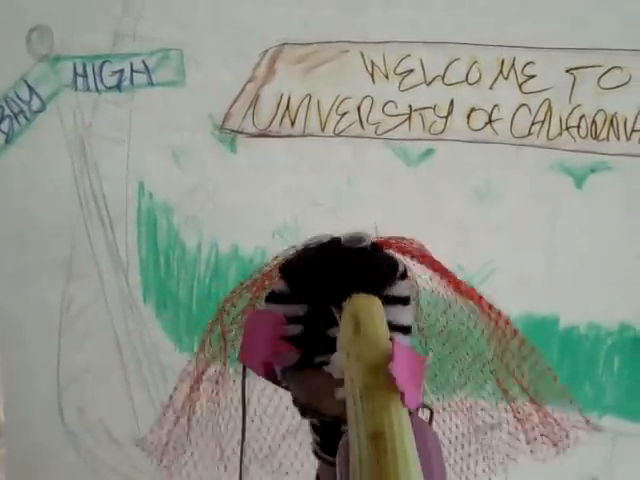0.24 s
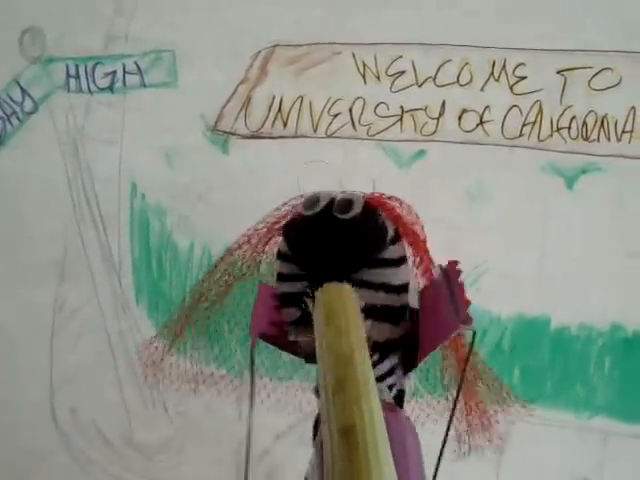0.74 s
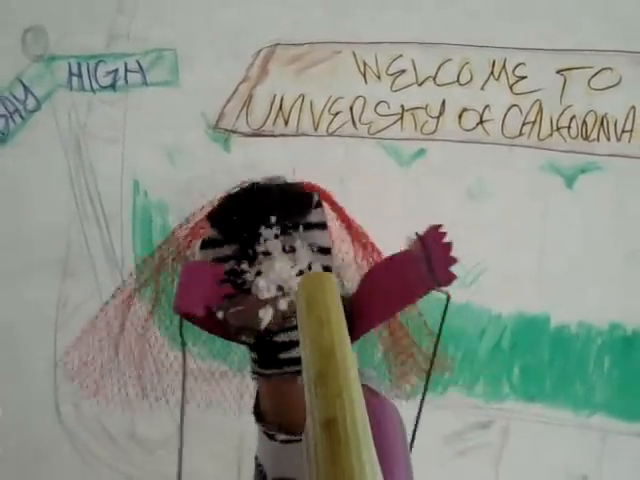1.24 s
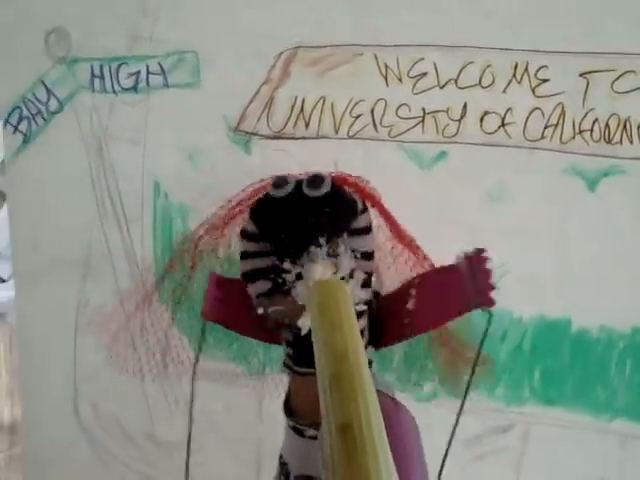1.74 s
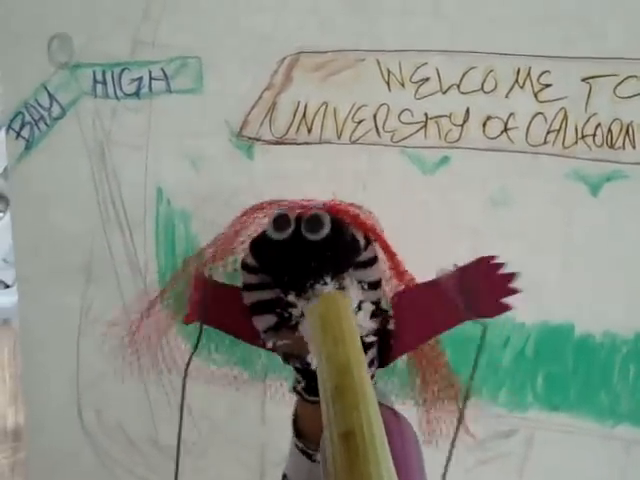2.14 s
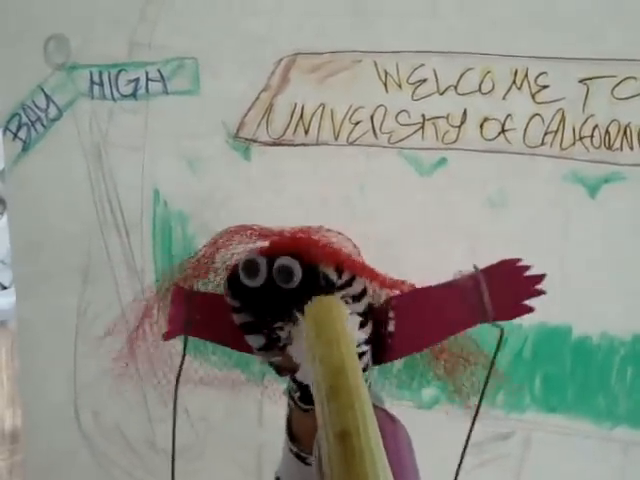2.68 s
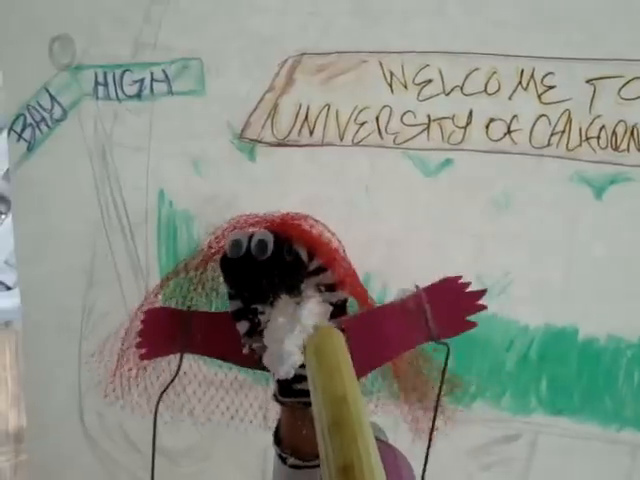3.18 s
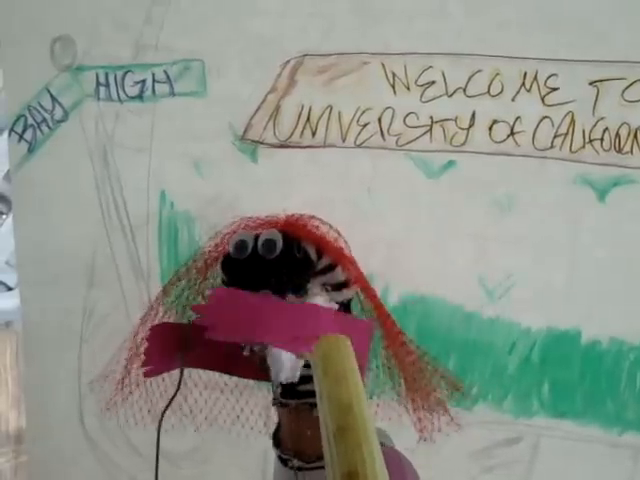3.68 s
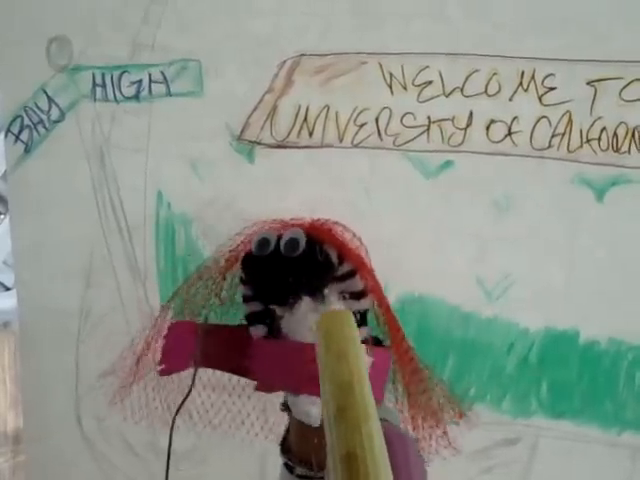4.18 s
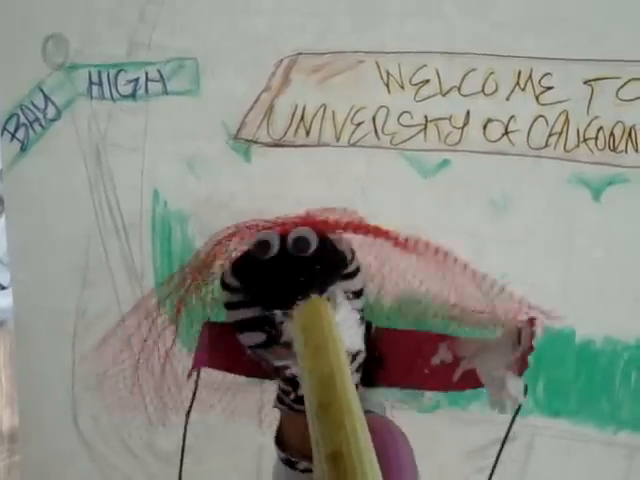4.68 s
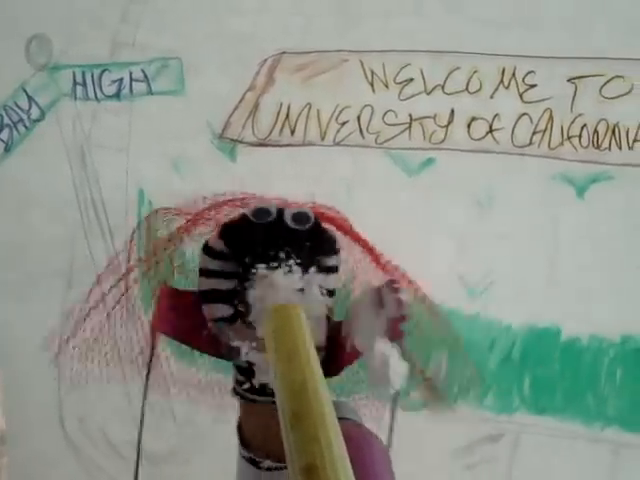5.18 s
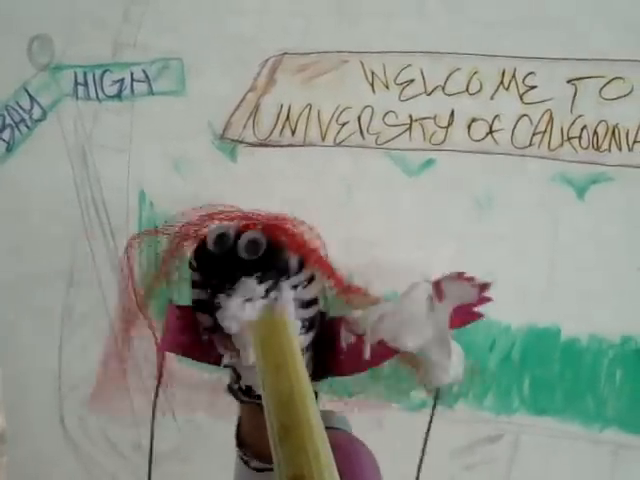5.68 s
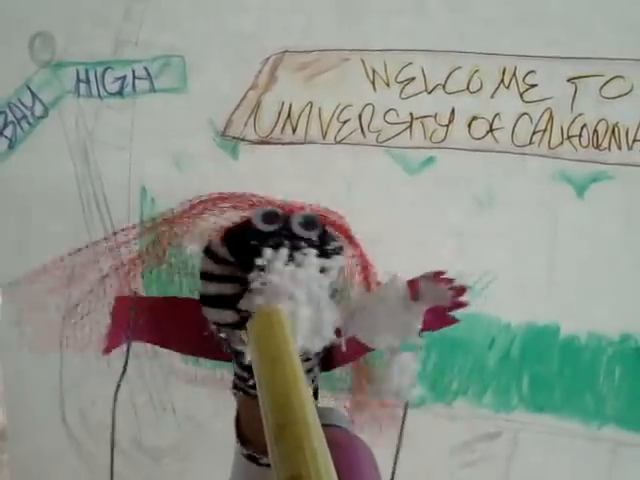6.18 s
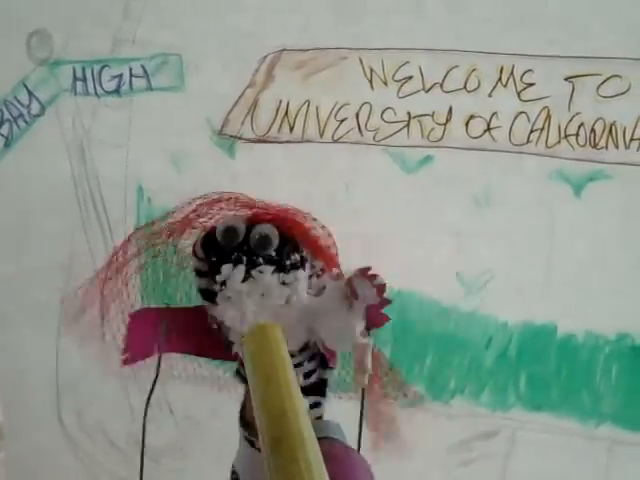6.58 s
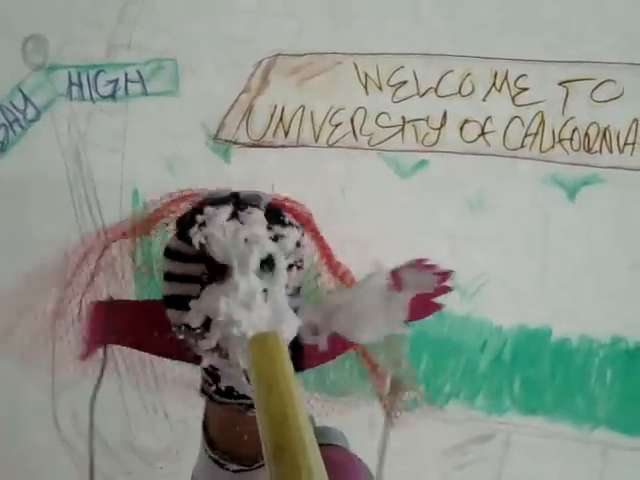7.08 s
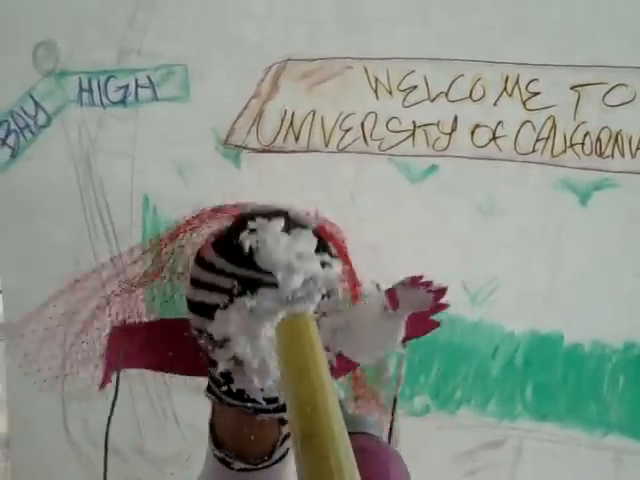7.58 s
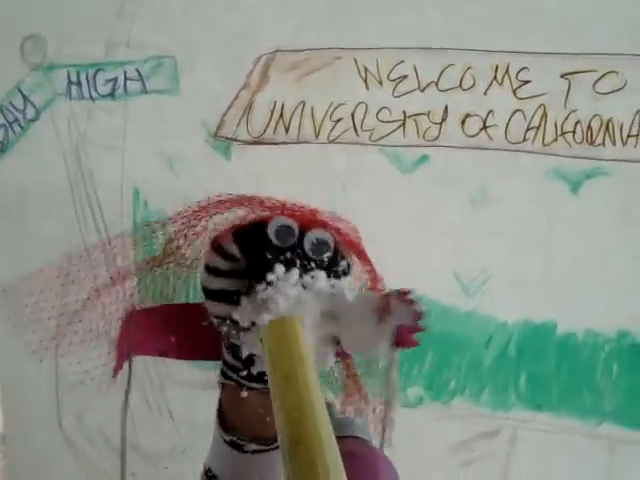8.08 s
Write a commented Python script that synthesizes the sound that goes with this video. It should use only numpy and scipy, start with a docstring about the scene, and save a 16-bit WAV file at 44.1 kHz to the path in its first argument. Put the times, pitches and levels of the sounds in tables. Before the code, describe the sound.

Very close to a small microphone in a dry room, a can sprays foam through a narrow tube. The first burst begins already running, wet and sputtering with hollow pops, sharp spits and air puffs. It cuts off, leaving fine fizz, crackles and a faint gas leak for about a second; then a second hissing burst continues to the end over low rumble and hum.

```python
"""In a room, close to a small microphone, a can sprays foam through a long plastic tube in two bursts.
Turbulent gas and bursting bubbles excite the resonances of the tube; large slugs ring it briefly, and
the jet hisses, flickers and spits. In the pause the foam fizzes and crackles, and a last leak of gas
creeps out. A volley of air puffs and a few single ones push the microphone, over a rumble with hum."""
import sys
import numpy as np
from scipy import signal
from scipy.fft import rfft, irfft
from scipy.io import wavfile

SR = 44100
rng = np.random.default_rng(int(sys.argv[2]) if len(sys.argv) > 2 else 0)


def ratio_of_db(decibels):
    """Turn decibels (scalar or array-like) into linear amplitude factors; 0 dB maps to 1."""
    return 10 ** (np.asarray(decibels, float) / 20)


def master(y):
    """Save y as 16-bit WAV."""
    cut = np.clip(np.atleast_2d(y).T, -1, 1)
    pcm = np.round(cut * 32767)  # scale
    wavfile.write(sys.argv[1], SR, pcm.astype(np.int16))


N = 367353

# Spectrum of the room's rumble: frequency_hz, density_db (per Hz, relative)
RUMBLE_SPECTRUM = [(18, -54), (30, -19.5), (122, -17), (360, -3), (428, -4), (572, -7.5), (1530, -15),
                   (1930, -16), (3000, -35), (3900, -61), (6600, -120)]
# Mains hum: frequency_hz, amplitude_db (relative to the rumble)
HUM_LINES = [(241, -12.5), (361, -19.5)]
# Single puffs of air on the microphone: start_s, push_db
SINGLE_PUFFS = [(0.374, -44), (4.943, -26), (5.639, -29), (6.2928, -29), (7.722, -31), (7.8089, -29)]
# Fizz of resting foam: time_s, level_db
FIZZ_LEVEL = [(2.84, -51), (2.97, -39.5), (3.13, -47), (3.23, -42), (3.3, -50), (3.5, -50.5), (3.63, -52.5),
              (3.8, -45.5), (3.9, -49.5), (4.02, -55)]
# Spectrum of that fizz: frequency_hz, density_db (per Hz, relative)
FIZZ_SPECTRUM = [(800, -12), (2000, -9.5), (4000, -9), (7000, -9.5), (10000, -16)]
# Large bubbles cracking in the pause: start_s, peak_db, centre_hz, t60_s
CRACKLES = [(2.874, -21, 5800, 0.063), (2.9185, -25, 7000, .02), (2.938, -29, 3800, .06),
            (3.0027, -23, 6940, 0.048), (3.059, -34, 3650, .05), (3.203, -37, 3040, .1),
            (3.6525, -34, 6000, .03), (3.689, -26, 4660, 0.043), (3.7214, -40, 4500, 0.045),
            (3.7373, -10.5, 6460, 0.024), (3.741, -24.5, 4500, 0.15)]
# Loud slugs of foam, each ringing one tube mode: start_s, peak_db, pitch_hz
SLUGS = [(0.028, -9, 1860), (0.054, -7, 1770), (0.076, -5, 1840), (0.1, -8, 1870), (0.161, -6, 1300),
         (0.232, -7, 1200), (0.253, -7, 1140), (0.376, -8, 1440), (0.4, -10, 1130), (0.483, -7, 1210),
         (0.607, -12, 1100), (0.684, -10, 1220), (0.711, -9, 1210), (0.937, -9, 1170), (0.962, -11, 1130),
         (1.059, -8, 1170), (1.271, -12, 1200), (1.325, -9, 1180), (1.358, -10, 1190), (5.3, -13, 1980),
         (5.838, -11, 1190)]
# Sharp spits of the jet: start_s, peak_db
SPITS = [(0.3196, -14), (0.576, -9), (0.6069, -13), (0.634, -10), (0.6683, -13), (0.8953, -11),
         (1.0075, -11), (1.3018, -11), (1.3442, -11), (1.513, -13), (4.0461, -25), (6.6003, -15),
         (7.7168, -21)]
# Resonances, one table a layer: centre_hz, width_hz, gain_db (relative)
FIRST_MODES = [(531, 220, -17.5), (763, 220, -7.5), (948, 138, -2.5), (1161, 239, -0.5)]
SECOND_MODES = [(1492, 280, -2), (1728, 243, 2), (1938, 237, 2.5), (2217, 640, -3)]
JET_MODES = [(2800, 760, 0.77), (3308, 700, 1.4), (3823, 1000, 1.7)]
WHISTLE_MODES = [(4420, 830, 0), (4784, 290, 2.5), (5230, 1100, 0)]
FIZZ_MODES = [(6310, 1740, 1), (8070, 4200, 0), (9300, 3100, 0)]
# The foam-filled tube during the leak: centre_hz, width_hz, gain_db (relative)
LEAK_MODES = [(915, 110, 0), (1700, 150, 0), (1960, 100, -3)]
# A bubble bursting outside the tip, which hardly rings: centre_hz, width_hz, gain_db
SNAP_MODES = [(1360, 2100, 0)]
# Flow through the tube, as level of the first layer: time_s, level_db
FLOW = [(0.0, -24), (0.08, -21.5), (0.3, -25), (0.6, -30.5), (0.8, -28), (1.45, -29.5), (2.5, -29.5),
        (2.66, -32.5), (2.76, -30), (4.045, -37), (4.1, -39.5), (4.17, -31.5), (4.7, -29), (5.2, -25),
        (5.5, -26), (6.7, -28), (7.35, -30.5), (7.65, -27), (7.95, -28.5), (8.33, -27)]
# Second layer at the usual flow: time_s, level_db
SECOND_LEVEL = [(0, -24), (0.3, -30), (0.7, -32), (1.1, -30.5), (2.15, -26.5), (2.5, -29.5), (8.33, -30.5)]
# Treble layers at the usual flow: time_s, jet_db, whistle_db, fizz_db
TREBLE_LEVELS = [(0, -27.5, -36.5, -34), (0.2, -28.5, -31.5, -35.5), (0.5, -27.5, -35, -33.5),
                 (1.2, -28.5, -31, -34), (1.6, -28, -33.5, -30.5), (2.15, -32, -38.5, -31),
                 (2.6, -37, -38, -35), (4.05, -31.5, -36.5, -35), (4.3, -35.5, -45, -33),
                 (4.7, -35.5, -39.5, -34.5), (4.95, -35, -34.5, -33), (6.3, -35, -33.5, -33.5),
                 (8.33, -35.5, -36.5, -33.5)]


def evened(x):
    """Normalisation: scales a signal to rms 1."""
    return x / np.sqrt(np.mean(x ** 2) + 1e-20)


def over_time(rows):
    """Linear interpolation: one curve over time for each column after the first."""
    time_s, *columns = np.transpose(rows)
    return [np.interp(np.arange(N) / SR, time_s, column) for column in columns]


def add(mix, start_s, sound):
    """Superposition: mixes a sound in at its start time."""
    part = mix[round(start_s * SR):][:len(sound)]
    part += sound[:len(part)]


def ring(x, modes):
    """Resonance: parallel two-pole peaks, with alternating signs as in a row of modes."""
    out = 0
    for k, (centre_hz, width_hz, gain_db) in enumerate(modes):
        b, a = signal.iirpeak(centre_hz, centre_hz / width_hz, SR)
        out = out + (-1) ** k * ratio_of_db(gain_db) * signal.lfilter(b, a, x)
    return out


def coloured(spectrum):
    """Spectral shaping: steady noise of the given density, rms 1."""
    hz, db = np.transpose(spectrum)
    bins_hz = np.fft.rfftfreq(N, 1 / SR) + 1
    gain = ratio_of_db(np.interp(np.log(bins_hz), np.log(hz), db))
    return evened(irfft(rfft(rng.standard_normal(N)) * gain, N))


def wander(cutoff_hz):
    """Slow random fluctuation: low-passed noise, rms 1."""
    b, a = signal.butter(2, cutoff_hz, fs=SR)
    return evened(signal.lfilter(b, a, rng.standard_normal(N)))


def clicks(per_s, spread_db):
    """Poisson process: random single clicks, a few of them large, rms 1."""
    size_db = spread_db * np.minimum(rng.exponential(1, N), 3.2)
    return evened(ratio_of_db(size_db) * (rng.random(N) < per_s / SR))


def burstlets(train, decay_s):
    """Relaxation: each click becomes an envelope of sudden start and exponential decay."""
    return evened(signal.lfilter([1], [1, -np.exp(-1 / (decay_s * SR))], train))


def swell(start_s, db, rise_s, length_s, fade_db):
    """Transient flow: a gain that rises fast, then fades ever faster until it ends."""
    t = np.arange(N) / SR - start_s
    rise = np.clip(t / rise_s, 0, 1) ** 2
    fade = ratio_of_db(db + fade_db * np.clip(t / length_s, 0, 1) ** 2)
    return rise * (t < length_s) * fade


def hum():
    """Periodic excitation: steady sinusoids of random phase."""
    s = np.arange(N) / SR
    return sum(ratio_of_db(db) * np.sin(2 * np.pi * (hz * s + rng.random())) for hz, db in HUM_LINES)


def room_rumble():
    """Background noise: low-frequency noise and hum that slowly grow together."""
    start_db, end_db, middle_s, growth_s = -54.5, -45.5, 3.07, 2.2
    grown = 0.5 + 0.5 * np.tanh((np.arange(N) / SR - middle_s) / growth_s)
    return ratio_of_db(start_db + (end_db - start_db) * grown) * (coloured(RUMBLE_SPECTRUM) + hum())


def puffs():
    """Impulse response of a diaphragm: each puff pushes it once and it swings slowly back."""
    t = np.arange(-200, 1500) / SR
    b, a = signal.butter(2, 45, "high", fs=SR)
    push = signal.lfilter(b, a, np.exp(-(t / 0.0003) ** 2))
    volley = swell(0.048, db=-23.5, rise_s=0.025, length_s=0.28, fade_db=-18)
    train = volley * (rng.random(N) < 160 / SR)  # 160 puffs per second
    for start_s, push_db in SINGLE_PUFFS:
        train[round(start_s * SR)] = ratio_of_db(push_db)
    return signal.oaconvolve(train, push)[200:][:N]


def echo(x):
    """Reverberation: sparse reflections of random sign that decay exponentially."""
    t60_s = 0.084
    at = np.arange(200, SR // 2, 20)
    taps = np.zeros(SR // 2 + 20)
    sign = rng.choice([-1., 1.], len(at))
    taps[at + rng.integers(0, 20, len(at))] = sign * ratio_of_db(-60 * at / SR / t60_s)
    return signal.oaconvolve(x, taps / np.linalg.norm(taps))[:N]


def foam_fizz():
    """Bubble coalescence: many tiny bursts make coloured noise flicker while the foam rests."""
    s = np.arange(N) / SR
    resting = (s > FIZZ_LEVEL[0][0]) & (s < FIZZ_LEVEL[-1][0])
    bursts = burstlets(clicks(per_s=180, spread_db=2), decay_s=0.0022)
    flicker = ratio_of_db(2.3 * wander(25)) * (2 + 0.36 * bursts)
    return ratio_of_db(over_time(FIZZ_LEVEL)[0]) * resting * evened(flicker * coloured(FIZZ_SPECTRUM))


def crackles():
    """Film rupture: each large bubble is a decaying noise burst through one broad resonance."""
    out, t = np.zeros(N), np.arange(5000) / SR
    for start_s, peak_db, centre_hz, t60_s in CRACKLES:
        envelope = ratio_of_db(-60 * t / t60_s) * (1 - np.exp(-t / 0.0008))
        noise = rng.standard_normal(len(t))
        crack = ring(noise * envelope, [(centre_hz, 0.72 * centre_hz, 0)])
        add(out, start_s, ratio_of_db(peak_db) * crack / abs(crack).max())
    return out


def leak():
    """Turbulence noise: the last gas creeps out through the foam-filled tube."""
    gain = swell(3.14, db=-49, rise_s=0.04, length_s=0.46, fade_db=-13)
    return gain * evened(ring(rng.standard_normal(N), LEAK_MODES))


def spits():
    """Jet noise: each spit is a short burst through the jet modes and the lowest whistle mode."""
    out, t = np.zeros(N), np.arange(900) / SR
    for start_s, peak_db in SPITS:
        noise = rng.standard_normal(len(t))
        spit = ring(noise * np.exp(-t / 0.003), JET_MODES + WHISTLE_MODES[:1])
        add(out, start_s, ratio_of_db(peak_db) * spit / abs(spit).max())
    return out


def slugs():
    """Free vibration: a slug rings one tube mode as a damped sine of a few cycles."""
    out, t = np.zeros(N), np.arange(900) / SR
    for start_s, peak_db, pitch_hz in SLUGS:
        envelope = (1 - np.exp(-t / 0.00081)) * np.exp(-t / 0.0013)
        slug = np.sin(2 * np.pi * pitch_hz * t) * envelope
        add(out, start_s, ratio_of_db(peak_db) * slug / abs(slug).max())
    return out


def slug_share():
    """Two-phase flow: the slugs' share (0-1) peaks as the tube fills, then settles."""
    s = np.arange(N) / SR
    start, peak, peak_s, steady, settle_s = 0.33, 0.72, 0.64, 0.35, 0.75
    filling = start + (peak - start) * s / peak_s
    settling = steady + (peak - steady) * np.exp((peak_s - s) / settle_s)
    return np.clip(np.minimum(filling, settling), 0, 1)


def mode_changes_db():
    """Variable damping: how single modes gain or lose strength over time."""
    s = np.arange(N) / SR
    # the clearest modes ring more around 1.47 s, and ever less as foam coats the tube
    clear_db = 4.5 * np.exp(-((s - 1.47) / 0.8) ** 2) - 0.22 * s
    # late on, the top of the whistle band takes over
    late_db = 3.5 * np.clip(s - 6.6, 0, 1)
    return {FIRST_MODES[-1]: clear_db,
            JET_MODES[0]: -0.8 * clear_db,  # the valley below the jet moves the other way
            JET_MODES[1]: clear_db,
            WHISTLE_MODES[0]: 0.6 * clear_db,
            WHISTLE_MODES[2]: late_db}


def spray():
    """Forced resonance: turbulence, bubble pops and the gas after each pop drive the tube modes."""
    s = np.arange(N) / SR
    shut_s, shut_db_per_s, open_s, open_db_per_s = 2.769, 200, 4.045, 453
    closing_db, opening_db = (s - shut_s) * shut_db_per_s, (open_s - s) * open_db_per_s
    valve_db = -np.clip(np.minimum(closing_db, opening_db), 0, 100)
    usual_flow_db = -28
    change_db = over_time(FLOW)[0] - usual_flow_db
    jet_db, whistle_db, fizz_db = over_time(TREBLE_LEVELS)
    second_db = over_time(SECOND_LEVEL)[0]
    share = slug_share()
    extra_db = mode_changes_db()
    shared_pops = clicks(per_s=200, spread_db=3.5)  # bubbles at the tip, heard in all modes
    choke = share * wander(46)  # foam at the tip makes the level waver, the treble most
    # modes, level_db, db gained per db of flow, share of bare pops, choke_db, patchiness_db
    layers = ((FIRST_MODES, usual_flow_db, 1, 0.9, 0.6, 1.2),
              (SECOND_MODES, second_db, 0.9, 0.9, 0.7, 1.5),
              (JET_MODES, jet_db, 0.7, 0.6, 1.3, 1.8),
              (WHISTLE_MODES, whistle_db, 0.6, 0.4, 1.8, 1.6),
              (FIZZ_MODES, fizz_db, 0.6, 0.3, 3.5, 3.2))
    out = np.zeros(N)
    for modes, level_db, follow, bare, choke_db, patchy_db in layers:
        layer = np.zeros(N)
        for mode in modes:
            own_pops = clicks(per_s=250, spread_db=5.0)  # bubbles sized for this mode
            pops = evened(0.83 * shared_pops + own_pops)
            gas_power = 1 - share + share * burstlets(pops, decay_s=0.002) ** 2
            gas = np.sqrt(abs(gas_power)) * rng.standard_normal(N)
            drive = gas + bare * share * pops
            drive_db = patchy_db * wander(17.2) + choke_db * choke + extra_db.get(mode, 0)
            once = ring(drive * ratio_of_db(drive_db), [mode])
            layer += ring(once, [(*mode[:2], 0)])  # twice: steep flanks, dark valleys
        out += ratio_of_db(level_db + follow * change_db) * evened(layer)
    snaps = evened(ring(ring(shared_pops, SNAP_MODES), SNAP_MODES))
    out += ratio_of_db(usual_flow_db + change_db - 4) * np.sqrt(share) * snaps
    return out * ratio_of_db(valve_db)


def scene():
    """Superposition: can and foam with their echo, the room's rumble and the puffs."""
    near = foam_fizz() + crackles() + leak() + spits() + slugs() + spray()
    b, a = signal.butter(3, 400, "high", fs=SR)  # the narrow tube radiates no bass
    near = signal.lfilter(b, a, near)
    return (room_rumble() + puffs() + ratio_of_db(-13) * echo(near) + near)[None]


def band_limit(x):
    """A steep low-pass at the top of the band."""
    return signal.sosfilt(signal.butter(12, 10990, fs=SR, output="sos"), x)


def record(dry):
    """Band limitation: the small recorder passes nothing far above 10 kHz."""
    edge = signal.firwin(511, 10030, window=("kaiser", 9), fs=SR)
    mix = signal.oaconvolve(dry, edge[None], "same")
    return band_limit(mix)


dry = scene()
out = record(dry)
master(out)
```